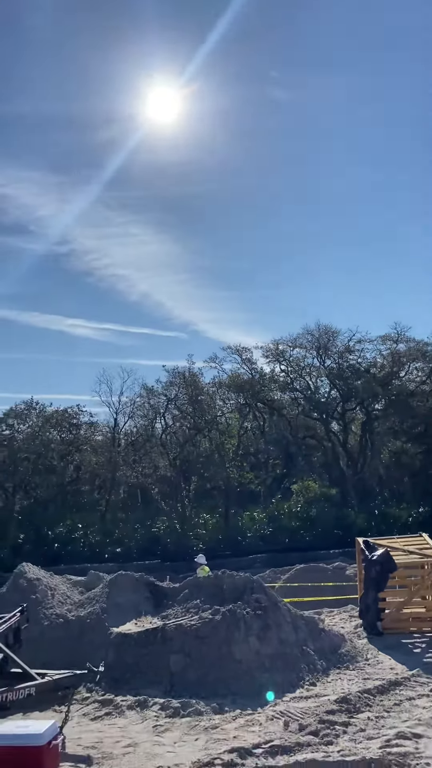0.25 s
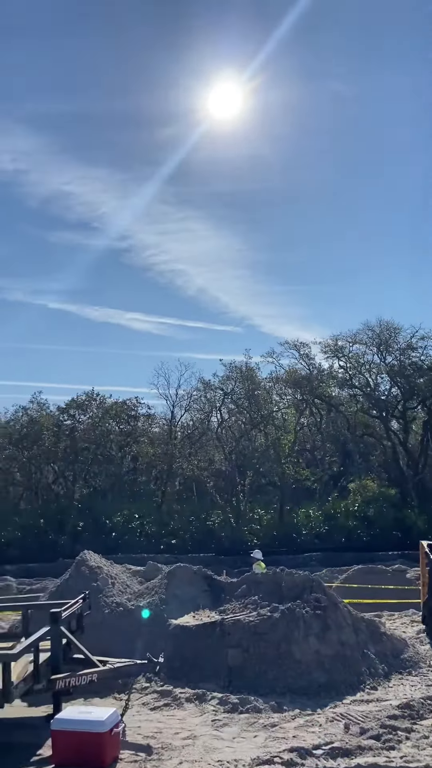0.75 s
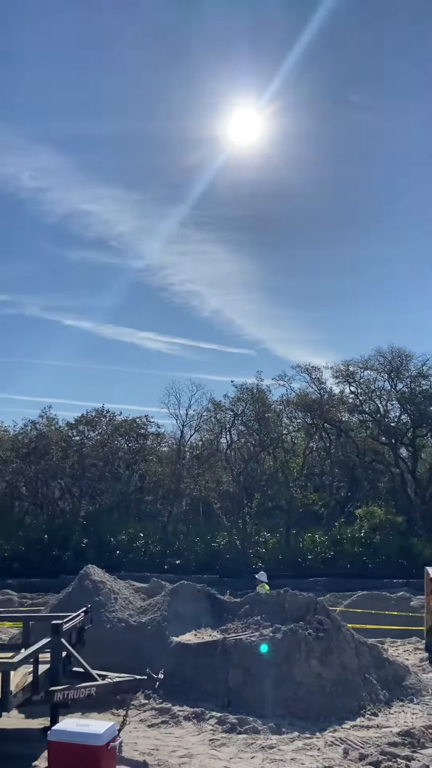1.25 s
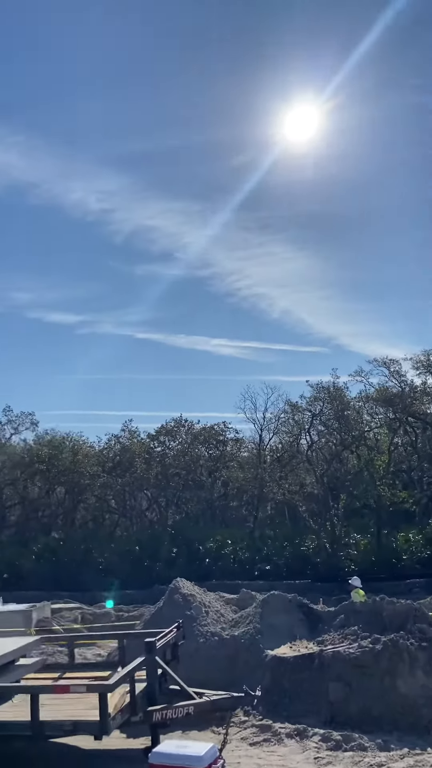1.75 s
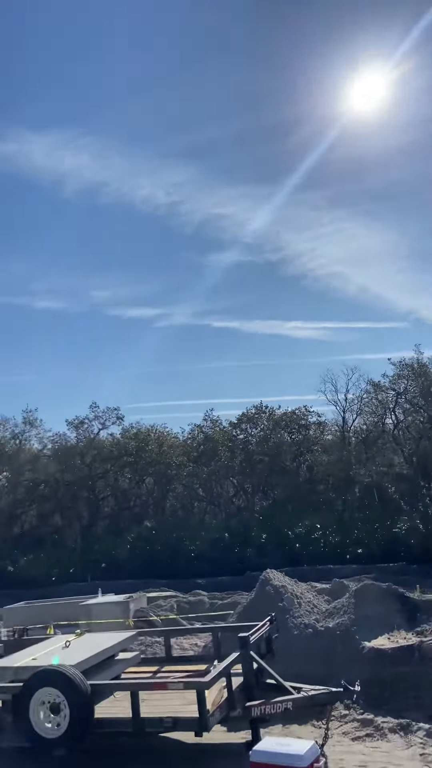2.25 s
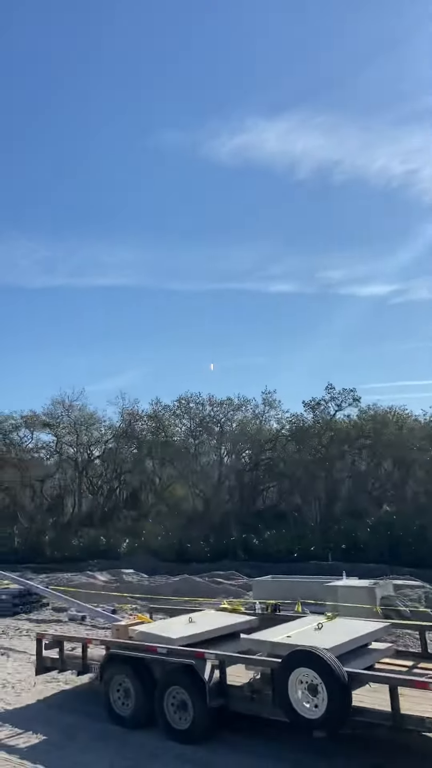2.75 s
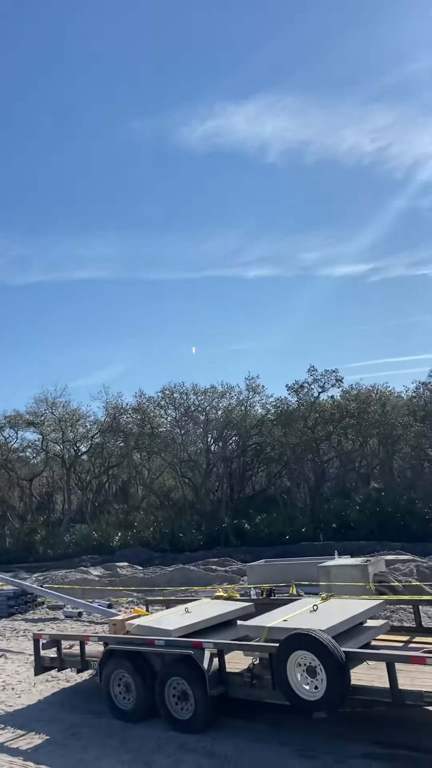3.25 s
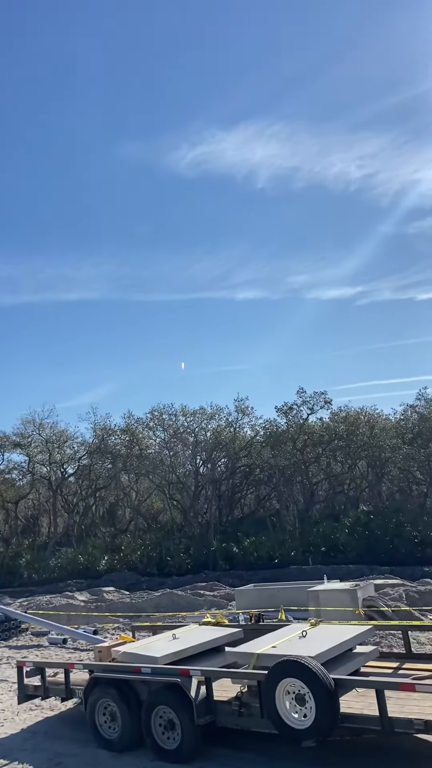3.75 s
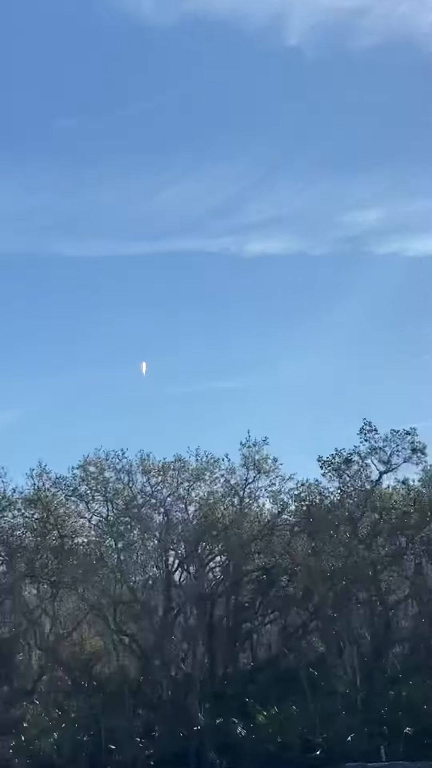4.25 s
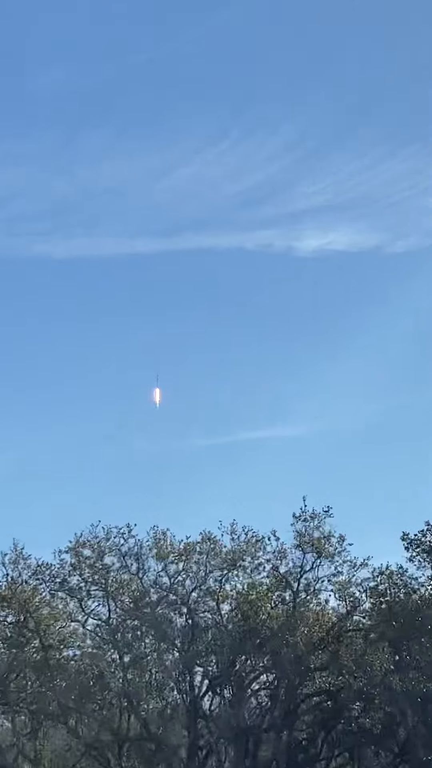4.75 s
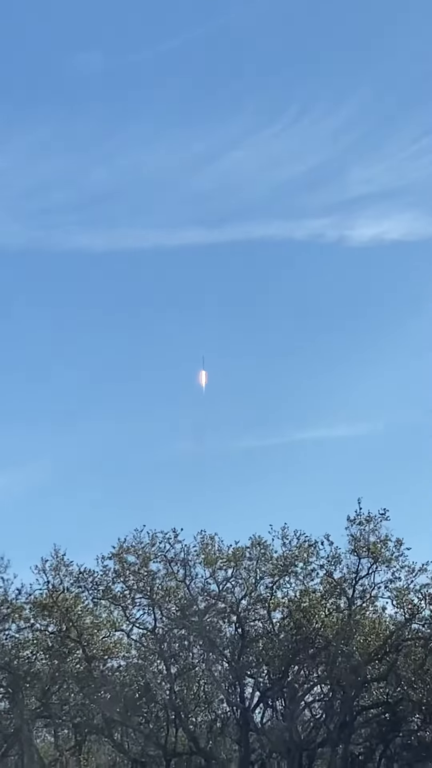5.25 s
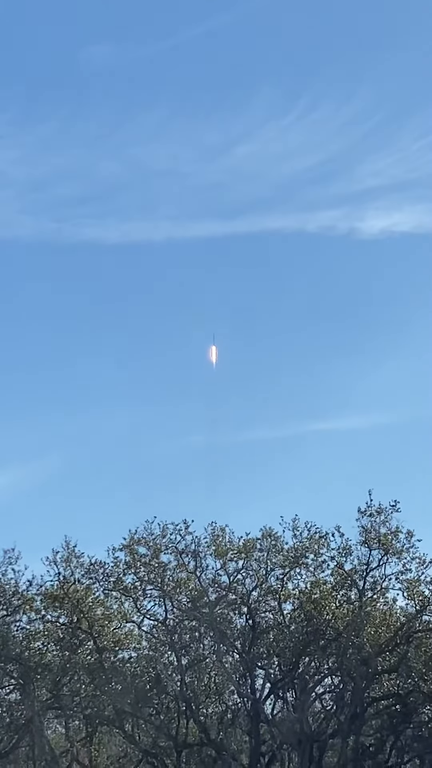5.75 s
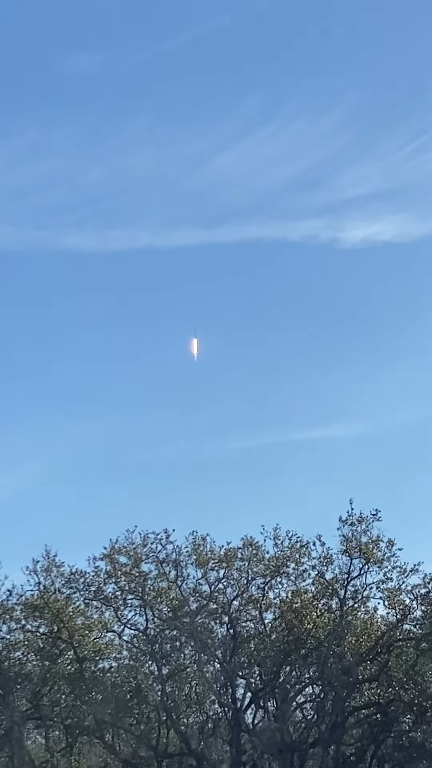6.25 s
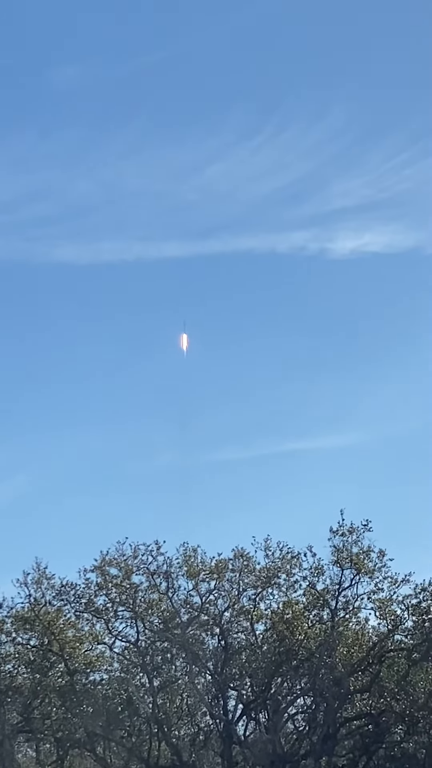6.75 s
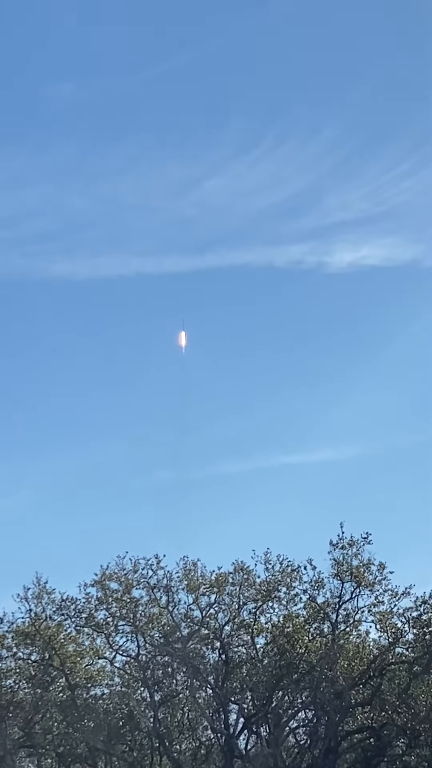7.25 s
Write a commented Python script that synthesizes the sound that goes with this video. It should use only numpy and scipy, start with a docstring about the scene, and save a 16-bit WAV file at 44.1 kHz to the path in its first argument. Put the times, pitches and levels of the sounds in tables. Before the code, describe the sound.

A phone outdoors on open sandy ground beside trees picks up a rocket a few kilometres away. From 0 s a deep, continuous rumble and rough low roar is present, with faint nearby machine hiss carrying blurred high tones. At about 0.1 s comes a tiny bright tick with a brief rattle and scrape. An isolated dull pop falls near 0.4 s. Around 1.8-2.5 s stronger low pops begin, and two short hollow knocks land at 2.2 and 2.4 s, the first cracking harder. The roar grows and crackle thickens from 3 s, bursting hardest and sharpest at about 4.0-4.1 s, with another sharp crack at 4.3 s. Dense, muffled thuds and crackles continue to 6.2 s, with faint reflections and a narrow bass throb, while the hiss nearly disappears. Afterwards pops become sparse and heavy rumbling continues to the cut at 7.5 s.

```python
"""On an open sandy site beside trees, a phone hears a rocket climb a few kilometres away.
A nearby machine hisses with blurred tones; the phone turns its gain down as the rocket grows, so the hiss
fades, as a table of levels sets out. Struck modes give two knocks and one tick. Jet turbulence is shaped
noise, roaring in the bass; shock fronts are filtered clicks that crackle over it. Delayed copies from the
ground and a sand bank comb the jet; the phone spreads fronts in time and limits."""
import sys
import numpy as np
from scipy import signal
from scipy.fft import rfft, irfft, next_fast_len
from scipy.io import wavfile
from scipy.ndimage import uniform_filter1d, minimum_filter1d

SR = 44100
rng = np.random.default_rng(int(sys.argv[2]) if len(sys.argv) > 2 else 0)


def log_audio(samples):
    """Write samples as a 16-bit WAV file to the path given in sys.argv[1]."""
    # one column per channel
    frames = np.atleast_2d(samples).T
    # limit to full scale, then quantise
    limited = np.clip(frames, -1, 1)
    pcm = np.round(limited * 32767).astype(np.int16)
    wavfile.write(sys.argv[1], SR, pcm)


N = 331632

# Machine hiss as heard through the phone's falling gain: [t/s, level/dB]
HISS_LEVEL = [(0, -51.5), (.15, -54.5), (.25, -50), (2.2, -50), (2.45, -55.5), (5.25, -57), (5.4, -66),
              (7.52, -63.5)]
# Spectrum of the hiss: [f/Hz, level/dB per Hz]
HISS_SPECTRUM = [(900, 5), (2000, -1.5), (3200, -0.5), (4100, -2.5), (4600, -4), (5600, -2), (6200, -1),
                 (7000, -14.5), (8500, -5), (10000, -8), (12000, -8), (14000, -15), (15800, -16.5)]
# Blurred tones in the hiss: [f/Hz, width/Hz, level/dB]
HISS_TONES = [(3660, 120, -16.5), (3950, 160, -11), (4290, 140, -14), (4700, 100, -20), (5120, 130, -18.5),
              (8900, 60, -21), (9600, 70, -22.5), (10100, 100, -20.5), (10600, 60, -24)]
# Part of the hiss that is unlike at the two ports: [f/Hz, level/dB against the hiss]
DIFFUSE_TILT = [(900, -3), (2500, -7), (4000, -4), (5500, -4), (8000, -14.5), (15000, -20.5)]

# Two knocks, the second with a softer rebound: [t/s, level/dB, crack/dB, snap/dB, nominal contact/ms]
KNOCKS = [(2.2265, 8, 8, -29.5, .15), (2.4258, 6, -12.5, -17.5, 0.85), (2.4293, 2, -19.5, -25, 0.99)]
# Modes of the struck body: [f/Hz, level/dB, 60 dB decay/s]
KNOCK_MODES = [(520, -11, 0.022), (618, -0.5, 0.016), (780, -3, 0.01), (980, -7, 0.012), (1325, -9, 0.013),
               (1520, -12.5, 0.011)]
# Spectrum of the first contact: [f/Hz, level/dB per Hz]
CRACK_SPECTRUM = [(700, -23), (1200, -1), (1600, 4), (2050, -4), (2450, 3), (2900, -7), (3800, -35.5),
                  (6500, -51.5), (9000, -70)]
# Spectrum of the brightest part of the contact: [f/Hz, level/dB per Hz]
SNAP_SPECTRUM = [(1500, -19), (2400, -8.5), (3100, 7.5), (3800, -6.5), (4800, -6), (5400, -14.5),
                 (6000, -5.5), (7000, -30.5), (8500, -21), (11000, -22)]
# Modes of the tick: [f/Hz, level/dB, 60 dB decay/s]
TICK_MODES = [(1440, -38.5, 0.12), (3920, -22, 0.008), (10000, -24.5, 0.0063)]
# Spectrum of the rattle after the tick: [f/Hz, level/dB]
RATTLE_SPECTRUM = [(1500, -32), (2500, -4), (4000, -4), (5700, -8.5), (6800, -35), (8000, -30), (8900, 1),
                   (9700, -1), (11000, -9), (12500, -31.5)]

# The jet as it arrives: [t/s, rumble level/dB, roar level/dB, crackle activity/dB]
JET_LEVELS = [(0.0, -19.5, -18, -46.5), (0.23, -17.5, -20, -49), (0.46, -20, -19, -49),
              (1.25, -16.5, -18, -51), (2.16, -19, -13.5, -50), (2.7, -17, -14, -47),
              (3.2, -15, -12.5, -45.5), (3.8, -17.5, -10, -45.5), (3.94, -14.5, -11.5, -41.5),
              (4.19, -16.5, -13, -43), (4.44, -19.5, -11.5, -43.5), (4.79, -14, -11.5, -47),
              (5.25, -17, -13, -48), (5.7, -15, -12.5, -46.5), (6.24, -17, -12.5, -52),
              (6.8, -15.5, -13, -48.5), (7.52, -11.5, -14.5, -51.5)]
# Spectrum of the deep rumble: [f/Hz, level/dB per Hz]
RUMBLE_SPECTRUM = [(8.8, -37.5), (15, -21.5), (35, 0.5), (54, -2), (91, -5.5), (151, -3), (200, -9),
                   (260, -34.5), (440, -120)]
# Narrow throb in the bass: [t/s, level/dB]
THROB_LEVEL = [(0, -34), (1, -34.5), (2, -28), (3, -29), (3.5, -24), (4.3, -24), (4.7, -21), (5.3, -16),
               (6.3, -16.5), (6.8, -19), (7.52, -19)]
# Spectrum of the roar: [f/Hz, level/dB per Hz]
ROAR_SPECTRUM = [(35, -25.5), (60, -11.5), (86, 2.5), (125, 0.5), (156, -6), (213, -10.5), (263, -8),
                 (305, -9), (348, -11.5), (450, -20.5), (589, -21.5), (965, -34), (3050, -64),
                 (3960, -86.5), (6710, -120)]
# Upper roar against its bass: [t/s, level/dB]
ROAR_BRIGHTNESS = [(0, 1), (.7, 0.5), (1.5, 2.5), (2.2, 0), (3, 1), (4, -1.5), (5, 1.5), (5.8, 1.5),
                   (6.5, 0.5), (7, 1.5), (7.52, 2.5)]
# Body of a shock front after its way through the air: [f/Hz, level/dB per Hz]
BODY_SPECTRUM = [(60, -19.5), (130, 0), (200, 6.5), (280, 8.5), (400, 10), (600, 6.5), (800, 0.5),
                 (1100, -13), (1600, -29.5), (2500, -47), (4000, -84)]
# Edge of a shock front, its steepest part: [f/Hz, level/dB per Hz]
EDGE_SPECTRUM = [(700, -26.5), (1000, -4.5), (1400, 3), (1800, 2.5), (2300, -3), (2800, -7), (3300, -11.5),
                 (3750, -20.5), (4200, -21.5), (5300, -25), (6500, -39), (7200, -56), (12000, -81.5)]
# Strongest fronts, ahead of the site's echoes: [t/s, peak of body/dB, peak of edge/dB]
STRONG_FRONTS = [(0.416, -20, -34.5), (1.766, -15, -41), (2.041, -8.5, -32.5), (2.346, -11, -36),
                 (2.497, -22, -42), (2.53, -19.5, -36.5), (2.695, -15.5, -36.5), (2.749, -24, -32),
                 (3.004, -20.5, -40), (3.083, -13, -43.5), (3.148, -15, -25), (3.212, -12.5, -35),
                 (3.274, -12.5, -41.5), (3.318, -7, -37.5), (3.346, -18, -36), (3.387, -17, -35.5),
                 (3.479, -22.5, -26.5), (3.488, -11.5, -29.5), (3.604, -9.5, -31.5), (3.625, -18.5, -29),
                 (3.66, -10.5, -34), (3.864, -12.5, -38), (3.946, -12.5, -29.5), (3.962, -5.5, -20),
                 (3.968, -14, -16.5), (4.003, -12, -21.5), (4.009, -4.5, -16.5), (4.015, -19.5, -31.5),
                 (4.054, -6.5, -31.5), (4.071, 1, -3.5), (4.073, -13.5, -22), (4.237, -7.5, -26.5),
                 (4.286, -12.5, -37.5), (4.311, -10.5, -30), (4.338, -5.5, -13), (4.344, -25.5, -24),
                 (4.417, -7.5, -28), (4.472, -11.5, -38.5), (4.485, -16, -33.5), (4.505, -11, -25.5),
                 (4.529, -13, -32.5), (4.564, -29.5, -37), (4.638, -7.5, -22), (4.644, -16, -33),
                 (4.678, -9.5, -26), (4.7, -17.5, -33.5), (4.725, -21.5, -36), (4.755, -19.5, -38),
                 (4.777, -13, -38.5), (4.817, -8, -24), (4.839, -14, -20.5), (4.869, -14.5, -39.5),
                 (4.937, -14.5, -24), (5.025, -14, -31), (5.05, -9, -34), (5.076, -5.5, -24.5),
                 (5.094, -24, -35.5), (5.137, -11.5, -31.5), (5.169, -7.5, -27.5), (5.201, -13.5, -33.5),
                 (5.222, -14.5, -28.5), (5.332, -15, -27.5), (5.38, -9.5, -32.5), (5.402, -8.5, -29),
                 (5.436, -10.5, -27.5), (5.455, -8, -28.5), (5.5, -16.5, -30), (5.539, -11.5, -30.5),
                 (5.572, -4.5, -20), (5.611, -3.5, -24.5), (5.626, -15, -26), (5.645, -16.5, -30.5),
                 (5.658, -7.5, -24.5), (5.674, -11.5, -29), (5.714, -8, -27), (5.724, -15.5, -34.5),
                 (5.754, -15, -34.5), (5.776, -16, -18.5), (5.812, -10, -28.5), (5.827, -1.5, -22.5),
                 (5.878, -2, -14.5), (5.888, -25, -37), (5.894, -18, -38.5), (5.935, -12.5, -26.5),
                 (5.949, -22.5, -30.5), (5.972, -6, -23), (6.031, -16.5, -35.5), (6.059, -4.5, -23),
                 (6.11, -4, -21), (6.155, -15, -36), (6.179, -2.5, -19.5), (6.184, -12, -42),
                 (6.222, -16.5, -39), (6.402, -14.5, -43), (6.425, -10, -32.5), (6.479, -17.5, -33),
                 (6.531, -16, -37.5), (6.669, -15, -38.5), (6.721, -22.5, -42.5), (6.919, -9, -39.5),
                 (6.99, -22, -31), (7.177, -21, -41.5), (7.366, -16.5, -31.5)]
# Where the site cancels the bass: [f/Hz, width/Hz, depth 0-1, held to .95 at most]
SITE_DIPS = [(85, 11, 1), (181, 34, 0.32), (311, 18, 0.8), (747, 9.9, 1)]

# Left minus right port: [f/Hz, level/dB]
PORT_DIFFERENCE = [(60, 0), (300, -0.15), (500, -0.5), (740, -7.5), (1130, 0.5), (1700, -.5)]
# Phase by which the left port leads: [f/Hz, phase/rad]
PORT_LEAD = [(30, 0.31), (150, -0.16), (520, -0.4), (860, 0.3), (1640, 0.24), (2410, 0.32)]
# Scatter from the trees, unlike at the two ports: [f/Hz, level/dB]
TREE_SCATTER = [(40, -37), (70, -35), (120, -17.5), (200, -21.5), (300, -23.5), (500, -16), (750, -10.5),
                (1100, -8.5), (1700, -13.5), (4000, -23)]

TOP_HZ = 15800  # upper limit of the phone
MARGIN = SR // 4  # samples of padding at each end of a filtered sound
SIZE = next_fast_len(N + 2 * MARGIN)
HZ = np.maximum(np.arange(SIZE // 2 + 1) * SR / SIZE, 1)

WAVER_DB = 1.5  # how far the machine tones swell and sink
HISS_LAG_S, HISS_ALIKE_HZ = 0.00017, 4570  # lag between the ports; where they agree in phase
TICK_S = .0885
RATTLE_S, RATTLE_DB = 0.0097, -20
SCRAPE_S, SCRAPE_DB, SCRAPE_HZ = 0.03, -26.5, 1800
EDGE_LATE_S, CRACK_LATE_S = .0009, .0008  # the edge peaks after the body begins to rise; so does the crack

GROWL_PER_S, GROWL_SPREAD_DB = 160, 6  # rate of the dull fronts; scatter of their sizes
GROWL_DB, GROWL_HZ, GROWL_WIDTH_HZ = -12, 344, 483  # level against the roar; band
THROB_HZ, THROB_WIDTH_HZ, BRIGHT_HZ = 62.3, 22, 190
SMALL_TAIL_S, SMALL_TAIL_DB = 0.0008, -3.5  # ragged tail of the small fronts
POPS_PER_S, POPS_FROM_S = 30, 1.5  # middling fronts, once the roar has grown
POP_DB, POP_SPREAD_DB, POP_EDGE_DB = -19, 4.5, -24.5  # body at full activity; scatter; edge under the body
FULL_DB, POP_PER_DB = -42.5, 1.5  # full crackle activity; pops die away faster than it does
TAIL_S, TAIL_RISE_S = 0.0073, .004  # the tail gathers only after the first arrival has passed
TAIL_DB, TAIL_PER_EDGE_DB = -7, -0.29  # the sharper the edge, the weaker the tail
BODY_RAGGED_DB = -4  # long waves are broken up less than the edge
# a small hard face nearby throws back only the top of each edge, heard from about 4.3 s on
SLAP_S, SLAP_DB, SLAP_HZ, SLAP_FROM_S = 0.0245, -7.5, 2690, 4.3
ECHO_S, ECHO_GAIN, ECHO_HZ = 0.00912, -0.24, 530  # the ground echo arrives inverted and dull
BANK_S, BANK_GAIN, BANK_LOW_HZ, BANK_HIGH_HZ = 0.01173, 0.39, 136, 320  # low middle, returned upright
CEILING, LEAN = .96, .22  # limit of the phone at full scale 1; upward asymmetry of loud bass


def undb(db):
    """A level in dB is twenty times the logarithm of an amplitude ratio; return that ratio."""
    return 10 ** (np.asarray(db) / 20)


def unit(x):
    """Mean power is the mean square; scale to rms 1."""
    return x / np.sqrt(np.mean(x ** 2))


def over_hz(table):
    """Spectra are read on a logarithmic frequency axis, between rows of f/Hz and value."""
    hz, value = np.transpose(table)
    return np.interp(np.log(HZ), np.log(np.maximum(hz, 1)), value)


def over_time(table):
    """Slow changes are read linearly at every sample, between rows of t/s and values."""
    s, *columns = np.transpose(table)
    return [np.interp(np.arange(N) / SR, s, column) for column in columns]


def shape(x, response):
    """A linear system multiplies each spectral component by its frequency response."""
    # mirrored ends let the sound go on past both ends
    padding = [(0, 0)] * (x.ndim - 1) + [(MARGIN, MARGIN)]
    wide = np.pad(x, padding, mode="reflect")
    return irfft(rfft(wide, SIZE) * response, SIZE)[..., MARGIN:MARGIN + N]


def resonance(hz, width):
    """A broad band falls off on both sides of its centre, by half in amplitude at half its width."""
    return 1 / (1 + (2 * (HZ - hz) / width) ** 2)


def noise(table):
    """Filtering white noise gives it the spectrum of a table; rms 1."""
    return unit(shape(rng.standard_normal(N), undb(over_hz(table))))


def walk(rate):
    """Slow random modulation: levels held 1 / rate seconds and smoothed twice; rms 1."""
    k = int(SR / rate)
    steps = np.repeat(rng.standard_normal(N // k + 1), k)
    return unit(uniform_filter1d(uniform_filter1d(steps, k), k)[:N])


def machine():
    """Broadband noise with blurred tones makes a hiss; an independent part makes its field diffuse."""
    level_db, = over_time(HISS_LEVEL)
    hiss = noise(HISS_SPECTRUM) * undb(.7 * walk(30))
    for hz, width, db in HISS_TONES:
        tone = unit(shape(rng.standard_normal(N), resonance(hz, width)))
        hiss += undb(db + WAVER_DB * walk(8)) * tone
    diffuse = shape(noise(HISS_SPECTRUM), undb(over_hz(DIFFUSE_TILT)))
    return undb(level_db) * hiss, undb(level_db) * diffuse


def ring(blows, modes):
    """A struck body answers each blow with a sum of exponentially decaying modes."""
    t = np.arange(SR // 5) / SR
    body = sum(undb(db) * np.sin(2 * np.pi * hz * t) * 1000. ** (-t / t60) for hz, db, t60 in modes)
    return signal.fftconvolve(blows, body)[:N]


def knocks():
    """Contact pulses excite hollow modes, and a short broadband crack and snap mark each contact."""
    blows, cracks, snaps = np.zeros((3, N))
    for s, db, crack_db, snap_db, contact_ms in KNOCKS:
        i = int(s * SR)
        push = np.hanning(int(contact_ms * SR / 1000) + 3)
        blows[i:i + len(push)] = undb(db) * push / push.sum()
        cracks[i], snaps[i] = undb(crack_db), undb(snap_db)
    # the struck thing is too small to send out bass
    radiated = 1 / (1 + (450 / HZ) ** 8) / (1 + (HZ / 1800) ** 6)
    crack_gain = unit(undb(over_hz(CRACK_SPECTRUM)))
    contact = shape(cracks, crack_gain * np.exp(-2j * np.pi * HZ * CRACK_LATE_S))
    contact += shape(snaps, unit(undb(over_hz(SNAP_SPECTRUM))))
    return shape(ring(blows, KNOCK_MODES), radiated) + contact


def tick():
    """One impulse excites bright modes; decaying noise adds a rattle and a lower scrape."""
    click, shake, scrape = np.zeros((3, N))
    t, i = np.arange(SR // 10) / SR, int(TICK_S * SR)
    click[i] = 1
    rattle = np.minimum(t / 0.0051, 1) * np.exp(-t / RATTLE_S) * rng.standard_normal(len(t))
    shake[i:i + len(t)] = undb(RATTLE_DB) * rattle
    scrape_swell = t / SCRAPE_S * np.exp(-2 * t / SCRAPE_S)
    # cubing makes the noise grainy
    scrape[i:i + len(t)] = undb(SCRAPE_DB) * scrape_swell * rng.standard_normal(len(t)) ** 3
    scrape = shape(scrape, 1 / (1 + (2 * (HZ - SCRAPE_HZ) / 1200) ** 4))
    return ring(click, TICK_MODES) + shape(shake, undb(over_hz(RATTLE_SPECTRUM))) + scrape


def random_clicks(per_s, spread_db):
    """Impulses at independent random times, with exponentially scattered levels."""
    when, size = rng.random((int(per_s * N / SR), 2)).T
    clicks = np.zeros(N)
    np.add.at(clicks, (when * N).astype(int), undb(spread_db * np.minimum(-np.log(size), 3.5)))
    return clicks


def growl():
    """Absorption in the air rounds off fronts; what remains is uneven low pops that roughen the roar."""
    pops = random_clicks(GROWL_PER_S, GROWL_SPREAD_DB)
    return unit(shape(pops, 1 / (1 + (2 * (HZ - GROWL_HZ) / GROWL_WIDTH_HZ) ** 4)))


def turbulence(rumble_db, roar_db):
    """Jet turbulence radiates broadband bass noise: a rumble with a narrow throb, and a fluctuating roar."""
    deep = noise(RUMBLE_SPECTRUM) * undb(rumble_db)
    throb = unit(shape(rng.standard_normal(N), resonance(THROB_HZ, THROB_WIDTH_HZ)))
    deep += throb * undb(over_time(THROB_LEVEL)[0])
    roar = noise(ROAR_SPECTRUM) * undb(roar_db + 1.0 * walk(25))
    upper = shape(roar, 1 / (1 + (BRIGHT_HZ / HZ) ** 4))
    roar += upper * (undb(over_time(ROAR_BRIGHTNESS)[0] + 1.3 * walk(20)) - 1)
    return deep + roar + growl() * undb(roar_db + GROWL_DB)


def burst(length_s, tail_db):
    """The air breaks up a front: its response is a first arrival, then a short ragged tail."""
    t = np.arange(SR // 20) / SR
    tail = np.minimum(t / TAIL_RISE_S, 1) * np.exp(-t / length_s) * rng.standard_normal(len(t)) ** 3
    tail *= undb(tail_db) / np.sqrt(np.sum(tail ** 2))
    tail[0] = 1
    return tail


def fronts(body, edge):
    """A front is a filtered impulse: clicks of size 1 take body or edge spectra; late edges slap back once."""
    body_gain, edge_gain = undb(over_hz(BODY_SPECTRUM)), undb(over_hz(EDGE_SPECTRUM))
    # dividing by the mean gain gives a click of size 1 a peak of 1
    edge = shape(edge, edge_gain / edge_gain.mean() * np.exp(-2j * np.pi * HZ * EDGE_LATE_S))
    lined_up = np.clip((np.arange(N) / SR - SLAP_FROM_S) / .2, 0, 1)
    # the filter passes above SLAP_HZ, so only the top of each edge is thrown back
    slap = shape(edge * lined_up, np.exp(-2j * np.pi * HZ * SLAP_S) / (1 + (SLAP_HZ / HZ) ** 8))
    return shape(body, body_gain / body_gain.mean()) + edge + undb(SLAP_DB) * slap


def small_fronts(activity_db, cluster_db):
    """Dense random impulses crowd into clusters, each smeared by a ragged tail."""
    clicks = random_clicks(900, 2.5)
    fade = np.exp(-1 / (SMALL_TAIL_S * SR))
    tail_power = signal.lfilter([1 - fade], [1, -fade], clicks ** 2)
    tails = np.sqrt(tail_power) * rng.standard_normal(N)
    smeared = clicks - clicks.mean() + undb(SMALL_TAIL_DB) * tails
    return unit(smeared) * undb(activity_db + cluster_db * walk(70))


def middling_pops(activity_db):
    """Fronts at random moments, their levels following the crackle activity: t/s, body/dB, edge/dB."""
    count = int(POPS_PER_S * (N / SR - POPS_FROM_S))
    when = rng.uniform(POPS_FROM_S * SR / N, .99, count)
    body_chance, edge_chance = np.clip(rng.standard_normal((count, 2)), -2, 2).T
    activity = activity_db[(when * N).astype(int)]
    body_db = POP_DB + POP_PER_DB * (activity - FULL_DB) + POP_SPREAD_DB * body_chance
    edge_db = body_db + POP_EDGE_DB + POP_SPREAD_DB * edge_chance
    return list(zip(when * N / SR, body_db, edge_db))


def crackle(activity_db, small_db=-3, small_edge_db=-18, cluster_db=4.0):
    """Steep shock fronts of small, middling and strong size superpose, each with a ragged tail."""
    small = small_fronts(activity_db, cluster_db)
    body, edge = small * undb(small_db), small * undb(small_edge_db)
    for s, body_db, edge_db in STRONG_FRONTS + middling_pops(activity_db):
        ragged, i = burst(TAIL_S, TAIL_DB + TAIL_PER_EDGE_DB * edge_db), int(s * SR)
        edge[i:i + len(ragged)] += undb(edge_db) * ragged
        body[i:i + len(ragged)] += undb(body_db + BODY_RAGGED_DB) * ragged
        body[i] += undb(body_db)
    return fronts(body, edge)


def site_response():
    """Interference: delayed reflections from ground and bank add to the direct sound and comb its spectrum."""
    ground = ECHO_GAIN * np.exp(-2j * np.pi * HZ * ECHO_S) / (1 + (HZ / ECHO_HZ) ** 2)
    bank_band = 1 / (1 + (HZ / BANK_HIGH_HZ) ** 4) / (1 + (BANK_LOW_HZ / HZ) ** 4)
    site = 1 + ground + BANK_GAIN * np.exp(-2j * np.pi * HZ * BANK_S) * bank_band
    for hz, width, depth in SITE_DIPS:
        site *= 1 - min(depth, .95) * resonance(hz, width)
    return site


def rocket():
    """Turbulence noise and shock fronts superpose, heard direct and again off the ground and a bank."""
    rumble_db, roar_db, activity_db = over_time(JET_LEVELS)
    return shape(turbulence(rumble_db, roar_db) + crackle(activity_db), site_response())


def scene():
    """Two-port hearing: far sounds differ in level and phase, near treble in lag; trees add an unlike tail."""
    hiss, diffuse = machine()
    near = hiss + tick()
    far = knocks() + rocket()  # the knocks share the ports' far response
    # each port takes half of the difference
    half = np.sqrt(undb(over_hz(PORT_DIFFERENCE)) * np.exp(1j * over_hz(PORT_LEAD)))
    lag = np.exp(1j * np.pi * HISS_LAG_S * (np.maximum(HZ, 3200) - HISS_ALIKE_HZ))
    t = np.arange(SR // 10) / SR
    tail = rng.standard_normal(len(t)) * np.exp(-t / .012)
    tail_phase = np.exp(1j * np.angle(rfft(tail, SIZE)))
    # the scattering paths shift as the source and the air move
    scatter = walk(53) * shape(far, undb(over_hz(TREE_SCATTER)) * tail_phase)
    side = diffuse + scatter
    left = shape(far, half) + shape(near, lag) + side
    right = shape(far, 1 / half) + shape(near, 1 / lag) - side
    return np.array([left, right])


def record(dry, turns=1.6, squeeze=0.43):
    """Compression, dispersion and limiting: the phone evens deep bass, makes fronts chirp down, holds peaks."""
    deep = shape(dry, 1 / (1 + (HZ / 70) ** 4))
    deep_power = uniform_filter1d(np.mean(deep ** 2, axis=0), SR // 30)
    swing = np.sqrt(np.abs(deep_power) + 1e-5)
    even = dry + deep * ((swing / 0.19) ** -squeeze - 1)
    # each frequency is delayed by some of its cycles, so the bass comes last
    phase = 2 * np.pi * turns * (HZ / TOP_HZ - np.log((HZ + 40) / TOP_HZ))
    late = shape(even, np.exp(1j * phase))
    # the loud bass swings further up than down
    bass = shape(late.mean(axis=0), 1 / (1 + (HZ / 250) ** 4))
    late += LEAN * (bass ** 2 - uniform_filter1d(bass ** 2, SR // 20))
    want = np.minimum(1, CEILING / np.maximum(np.abs(late).max(axis=0), 1e-9))
    hold = int(.004 * SR)
    gain = minimum_filter1d(want, hold)
    gain = uniform_filter1d(uniform_filter1d(gain, hold // 2), hold // 2)
    low_pass = signal.ellip(8, .1, 40, TOP_HZ, fs=SR, output="sos")
    return signal.sosfiltfilt(low_pass, late * gain)


dry = scene()
out = record(dry)
log_audio(out)
```